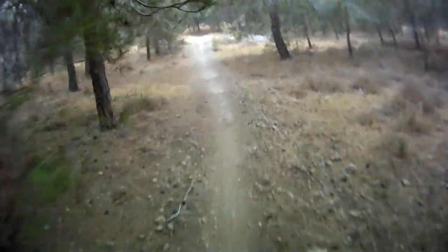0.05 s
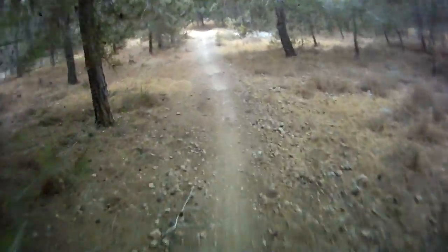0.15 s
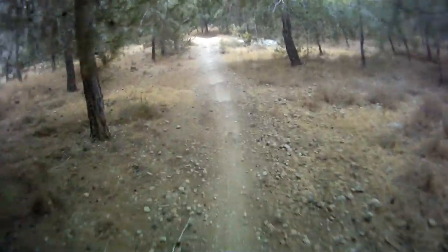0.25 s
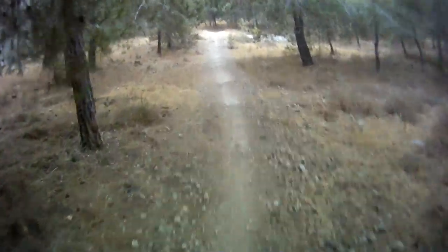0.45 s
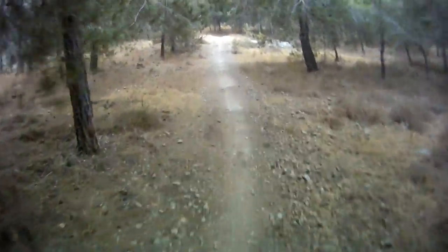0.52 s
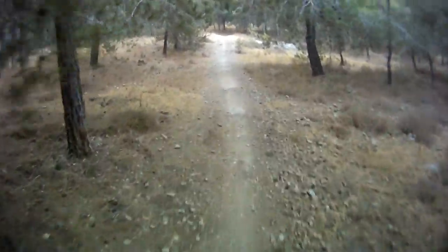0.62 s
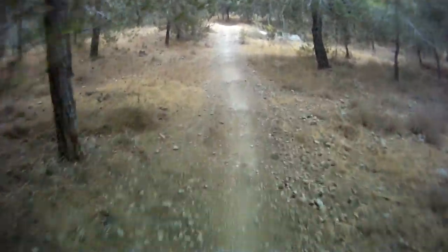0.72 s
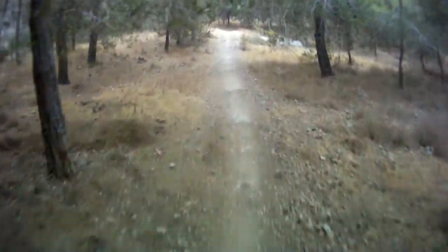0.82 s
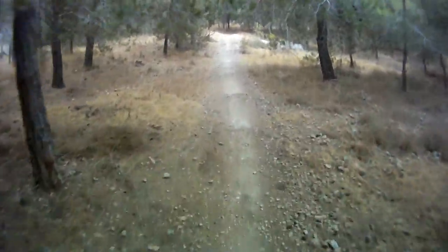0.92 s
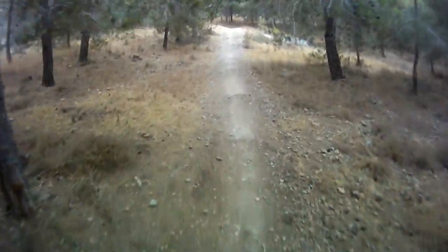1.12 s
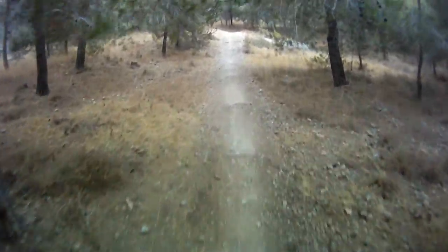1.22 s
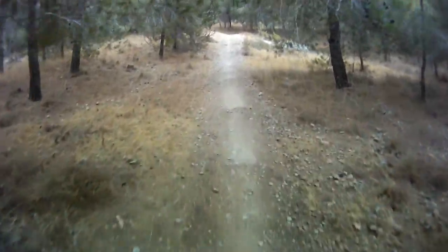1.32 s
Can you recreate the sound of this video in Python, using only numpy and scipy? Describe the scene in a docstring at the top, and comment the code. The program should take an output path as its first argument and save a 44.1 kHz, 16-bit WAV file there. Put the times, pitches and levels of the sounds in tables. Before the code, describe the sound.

Something like a twig strikes a mountain bike's camera with one loud, hollow, scratchy clack, close enough to overload the microphone. Around it, tyres roll quietly over a dirt forest trail, with a few faint stone ticks.

```python
"""On a dirt forest trail, a mountain bike carrying a camera rolls downhill and takes one hard jolt.
Something, probably a twig, knocks on the camera housing, with one hollow clunk, and scrapes and
squeaks along it, so close to the microphone that it overloads. Around the jolt, small stones tick
and the tyres rumble softly over the dirt. A faint whirr comes in near the end."""
import sys
import numpy as np
from scipy import signal
from scipy.fft import rfft, irfft
from scipy.io import wavfile
from scipy.ndimage import uniform_filter1d

SR = 44100
rng = np.random.default_rng(int(sys.argv[2]) if len(sys.argv) > 2 else 0)


def generate_wav(sig):
    """Save sig (samples, or channels by samples) to the path in sys.argv[1] as 16-bit PCM at SR."""
    pcm = np.round(np.clip(np.atleast_2d(sig).T, -1, 1) * 32767).astype(np.int16)
    wavfile.write(sys.argv[1], SR, pcm)


N = 59535

# Hard knocks on the camera housing. A fade time is how long a sound takes to drop by 60 dB.
# (time [s], crack level [dB], ring level [dB], crack fade time [s], treble tilt [dB per octave])
KNOCKS = [(0.2458, -21, -38.5, .03, 0), (0.2471, -15.5, -27, .02, 0.5), (0.2489, -1, -6, .026, -1.26),
          (0.2523, -6, -15.5, .015, -0.5), (0.2570, -12.5, -15, .02, -2), (0.2608, 1.5, -18.5, .008, 1.5),
          (0.2646, -10.5, -27, .014, 2.5), (0.2729, -1, -6.5, .026, 0.5), (0.2790, -4.5, -18.5, .011, -1),
          (0.2885, -24, -36.5, .018, 2.5), (0.304, -12, -22, .014, 1), (0.3088, -12.5, -23.5, .016, 1),
          (0.3120, -12, -20.5, .022, 2.5), (0.3141, -12, -25.5, .02, 0), (0.3151, -13.5, -25.5, .028, 1),
          (0.3278, -27.5, -31, .018, 0), (0.3322, -32, -44, 0.019993, 3), (0.3422, -27, -60, .008, 3),
          (0.353, -44, -71, 0.0112, 5)]
# The tones that the struck housing rings with: (pitch [Hz], relative level [dB], fade time [s])
HOUSING_TONES = [(309, -19.5, .07), (707, -8.5, .045), (922, -12.5, 0.035), (1081, -12, 0.029),
                 (1372.6, -6.5, 0.049), (2066, -5.5, 0.055), (2242, -3.5, .045), (2383, -4.5, 0.047),
                 (2660, -9, .045), (4024, -9, 0.027), (4297, -7.5, 0.032), (4630, -10, 0.043),
                 (5072, -12.5, .05), (6229, -13, 0.062)]
# The mix of low and high in a crack or scrape: (frequency [Hz], relative level [dB])
CRACK_COLOUR = [(30, -19.5), (150, -19), (230, -16.5), (310, -6), (480, -8.5), (700, -8), (860, -12.5),
                (1350, -3), (2300, 3), (3400, -0.5), (4500, -0.5), (7000, -8), (10000, -12), (15000, -21.5),
                (18000, -37.5)]
# Scrapes along the housing: (time [s], length [s], level [dB], treble tilt [dB per octave])
SCRAPES = [(0.256, .022, -20, -0.5), (0.276, .030, -29.5, -0.5), (0.299, 0.02224, -23, 0),
           (0.321, 0.013, -42.5, -6.5), (0.3372, .008, -35, 3)]
# Squeaks on the housing: (time [s], length [s], first pitch [Hz], last pitch [Hz], level [dB])
SQUEAKS = [(0.253, .003, 4100, 4330, -3.5), (0.2746, 0.006, 6006, 6655, -2),
           (0.2771, .004, 7953, 8500, -4.5), (0.2828, 0.002, 6502, 6530, -21),
           (0.2876, .0042, 6470, 6450, -24)]
# Small stones ticking:
# (time [s], level [dB], band centre [Hz], band width to each side [octaves], fade time [s])
STONES = [(0.018, -55.5, 2410, .7, 0.043), (0.121, -58, 2600, 0.56, 0.028),
          (0.1852, -45, 2500, 0.98, 0.024), (0.401, -48, 4000, 0.24, 0.0087),
          (0.4091, -41.5, 3500, .55, 0.013), (0.5335, -55.5, 1880, 0.51, 0.026),
          (0.5807, -40, 2100, .8, .013), (0.6075, -49, 2980, 0.43, 0.015),
          (0.6174, -51.5, 2380, 0.82, .014), (0.7335, -49, 3160, .7, 0.01421),
          (0.8315, -52, 2520, 0.62, 0.0094), (1.0955, -36, 1350, .7, .017)]
# The tones that the housing gives to each tick: (pitch [Hz], relative level [dB])
TICK_TONES = [(380, -7), (650, 8.5), (1380, 2), (1750, -1.5), (2150, 2.5), (2800, -7), (3700, -5.5),
              (5200, -10), (9200, 3)]
# The scratchy part of a tick: (frequency [Hz], relative level [dB])
SCRATCH_COLOUR = [(650, 2), (1000, -14), (1400, 0), (4000, 0), (12000, 2)]
# How loud the rolling tyres are: (time [s], rumble level [dB], crunch level [dB])
TYRE_LEVELS = [(0, -50.5, -70), (.13, -50, -69), (.23, -47, -69), (.37, -53, -70.5), (.47, -54, -69.5),
               (.55, -50.5, -65), (.69, -48, -67.5), (.80, -50, -70.5), (.92, -52, -66), (1.0, -53, -70),
               (1.13, -50.5, -65), (1.35, -55.5, -67.5)]
# The low rumble of the tyres: (frequency [Hz], relative level [dB])
RUMBLE_COLOUR = [(20, 12.5), (35, 13), (75, 11.5), (160, 4.5), (380, 2), (610, -1.5), (690, -11.5),
                 (1000, -21.5), (2000, -45.5)]
# The crunch of the dirt: (frequency [Hz], relative level [dB])
CRUNCH_COLOUR = [(700, -25), (1100, -12), (1350, 0), (1900, -1.5), (2900, -3.5), (4000, -13), (4700, -9.5),
                 (7000, -19.5), (12000, -27.5)]
# The recorder's own hiss: (frequency [Hz], relative level [dB])
HISS_COLOUR = [(100, 0.5), (5500, 1), (8000, -1.5), (10500, -2), (12200, 2), (15100, -2.5), (15500, -34.5)]
# The recorder's faint whine: (pitch [Hz], level [dB])
WHINE_TONES = [(5545, -83.5), (11090, -76)]

CRACK_RISE_S, RING_RISE_S, GRAIN_DB = 0.00015, 0.00035, 2


def knocks():
    """Something strikes the camera housing: each hit is a gritty crack and a short ring."""
    out, t = np.zeros(N), np.arange(2 ** 13) / SR
    for start, crack_db, ring_db, fade_s, tilt_db in KNOCKS:
        crack = colour(grit(GRAIN_DB, len(t)), CRACK_COLOUR, tilt_db) * amp(crack_db) * fade(t, fade_s)
        ring = sum(amp(db + ring_db) * fade(t, ring_s) * np.sin(2 * np.pi * hz * t)
                   for hz, db, ring_s in HOUSING_TONES)
        add(out, start, crack * rise(t, CRACK_RISE_S) + ring * rise(t, RING_RISE_S))
    return out


def clunk(start=.2495, hz=1464, db=-4.5, fade_s=0.027):
    """The heaviest knock sets off one hollow tone that swells and dies quickly."""
    out, t = np.zeros(N), np.arange(2 ** 13) / SR
    shape = rise(t, rise_s=.002) * np.exp(-np.log(1000) * (t / fade_s) ** 2)
    add(out, start, amp(db) * shape * np.sin(2 * np.pi * hz * t))
    return out


def squeaks(wobble=0.058):
    """Something pressed hard on the housing sticks and slips, making a shaky, gliding tone."""
    out = np.zeros(N)
    for start, length, first_hz, last_hz, db in SQUEAKS:
        n = round(length * SR)
        hz = np.linspace(first_hz, last_hz, n) * (1 + wobble * wander(2048, span=12)[:n])
        tone = np.sin(2 * np.pi * np.cumsum(hz) / SR)
        add(out, start, amp(db) * signal.windows.tukey(n, .5) * tone)
    return out


def scrapes():
    """Something slides along the housing in a short swell of gritty noise."""
    out = np.zeros(N)
    for start, length, db, tilt_db in SCRAPES:
        scrape = colour(grit(GRAIN_DB, 4096), CRACK_COLOUR, tilt_db)[:round(length * SR)]
        swell = np.sin(np.linspace(0, np.pi, len(scrape)))
        add(out, start, amp(db) * scrape * swell)
    return out


def stones(scratch_db=-4):
    """Each stone gives a brief ringing tick, coloured by the camera housing, with a little scratch."""
    out, t = np.zeros(N), np.arange(2 ** 11) / SR
    hz = np.fft.rfftfreq(len(t), 1 / SR) + 1
    for start, db, centre_hz, width, fade_s in STONES:
        band = 1 / (1 + (np.log2(hz / centre_hz) / (2 * width)) ** 2) ** 3
        ring = sum(amp(level) * np.interp(pitch, hz, band) * np.sin(2 * np.pi * (pitch * t + rng.random()))
                   for pitch, level in TICK_TONES)
        band_noise = irfft(band * rfft(rng.standard_normal(len(t))))
        tick = unit(unit(ring) + amp(scratch_db) * colour(band_noise, SCRATCH_COLOUR))
        add(out, start, amp(db) * tick * fade(t, fade_s) * rise(t, RING_RISE_S))
    return out


def tyres(lump_db=2):
    """Rolling tyres make a lumpy low rumble, with a fine crunch of dirt above it."""
    t = np.arange(N) / SR
    times, rumble_db, crunch_db = np.transpose(TYRE_LEVELS)
    rumble = colour(rng.standard_normal(N), RUMBLE_COLOUR)
    rumble *= amp(np.interp(t, times, rumble_db) + lump_db * wander(N, span=700))
    crunch = colour(grit(grain_db=4.5, size=N), CRUNCH_COLOUR)
    crunch *= amp(np.interp(t, times, crunch_db) + lump_db * wander(N, span=500))
    return rumble + crunch


def whirr(start=1.0, rise_s=.15, centre_hz=4686, width_hz=350, db=-75.5):
    """A thin, fuzzy whistle from the bike fades in near the end."""
    t, hz = np.arange(N) / SR, np.fft.rfftfreq(N, 1 / SR)
    band = 1 / (1 + (2 * (hz - centre_hz) / width_hz) ** 2)
    whistle = unit(irfft(band * rfft(rng.standard_normal(N)), N))
    return amp(db) * whistle * np.clip((t - start) / rise_s, 0, 1)


def amp(db):
    """Turns decibels into a number to multiply by."""
    return 10 ** (np.asarray(db) / 20)


def unit(x):
    """Scales a sound to an average (rms) strength of 1."""
    return x / np.sqrt(np.mean(x ** 2) + 1e-20)


def rise(t, rise_s):
    """Climbs smoothly from 0 towards 1."""
    return 1 - np.exp(-t / rise_s)


def fade(t, fade_s):
    """Dies away by 60 dB in fade_s seconds."""
    return np.exp(-np.log(1000) * t / fade_s)


def add(mix, start, sound):
    """Mixes a sound in at a start time in seconds."""
    part = mix[round(start * SR):][:len(sound)]
    part += sound[:len(part)]


def colour(x, points, tilt_db=0):
    """Shapes the lows and highs at strength 1; the tilt acts above about 1000 Hz."""
    octave = np.log2(np.fft.rfftfreq(len(x), 1 / SR) + 1)
    hz, db = np.transpose(points)
    curve_db = np.interp(octave, np.log2(hz), db) + tilt_db * np.maximum(octave, 10)
    return unit(irfft(rfft(x) * amp(curve_db), len(x)))


def grit(grain_db, size):
    """A stream of tiny hits; more grain_db makes them more uneven."""
    return rng.standard_normal(size) * amp(grain_db * np.minimum(rng.exponential(1, size), 4))


def wander(size, span):
    """A smooth random drift of strength 1 that changes over about span samples."""
    return unit(uniform_filter1d(uniform_filter1d(rng.standard_normal(size), span), span))


def scene():
    """The jolt over the rolling bike, in one channel."""
    return (knocks() + clunk() + scrapes() + squeaks() + stones() + tyres() + whirr())[None]


def record(dry, hiss_db=-68, ceiling=0.99, hardness=4.0, low_cut_hz=200, high_cut_hz=17070):
    """The recorder adds hiss and whine, overloads, thins the bass and cuts the highest treble."""
    t = np.arange(N) / SR
    whine = sum(np.sqrt(2) * amp(db) * np.sin(2 * np.pi * hz * t) for hz, db in WHINE_TONES)
    x = dry + whine + amp(hiss_db) * colour(rng.standard_normal(N), HISS_COLOUR)
    x = x / (1 + abs(x / ceiling) ** hardness) ** (1 / hardness)  # flattens the loudest peaks
    x = signal.lfilter(*signal.butter(1, low_cut_hz, "highpass", fs=SR), x)
    treble_cut = signal.firwin(255, high_cut_hz, window=("kaiser", 8), fs=SR)
    return signal.oaconvolve(x, treble_cut[None], "same")


dry = scene()
out = record(dry)
generate_wav(out)
```